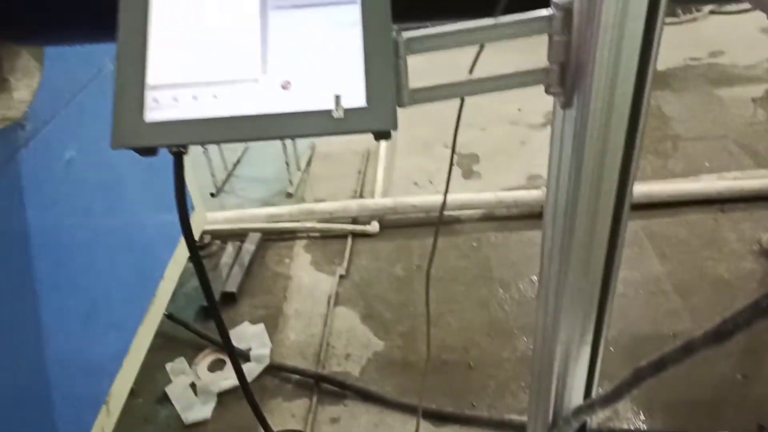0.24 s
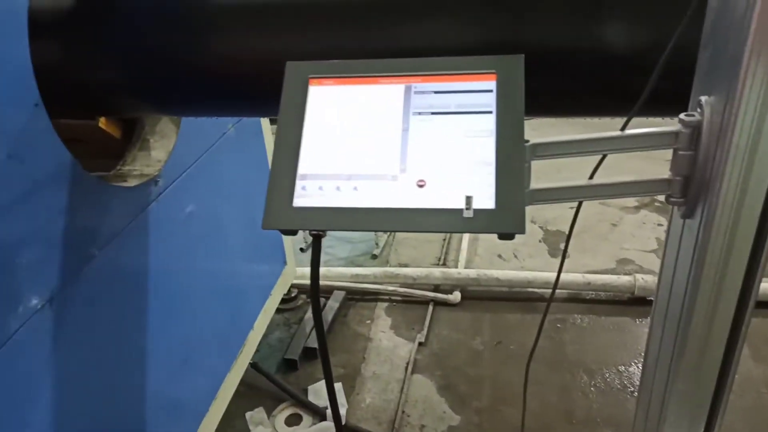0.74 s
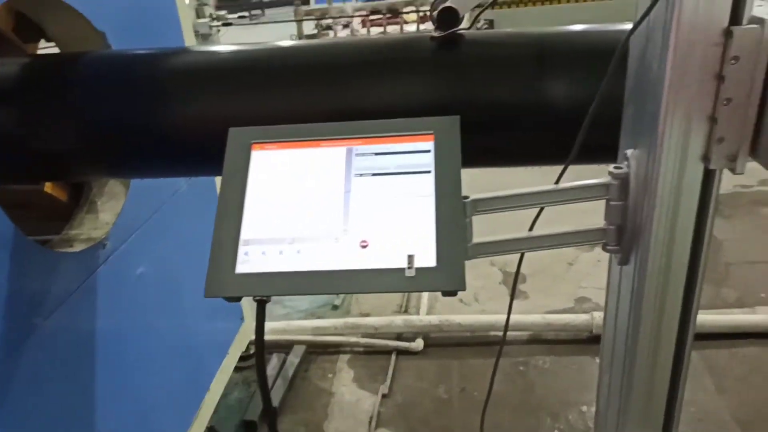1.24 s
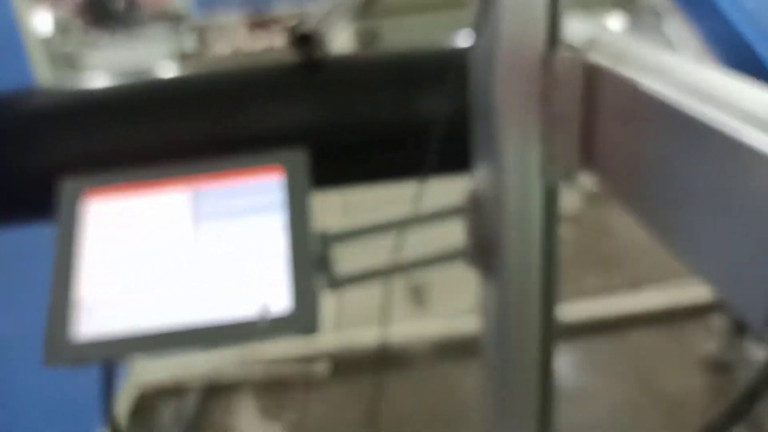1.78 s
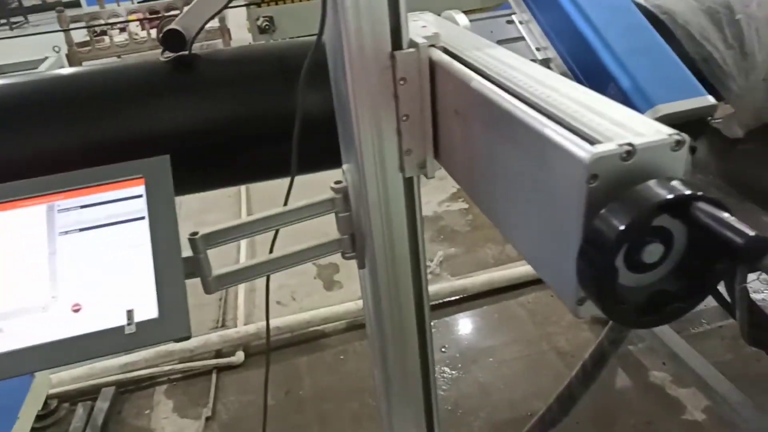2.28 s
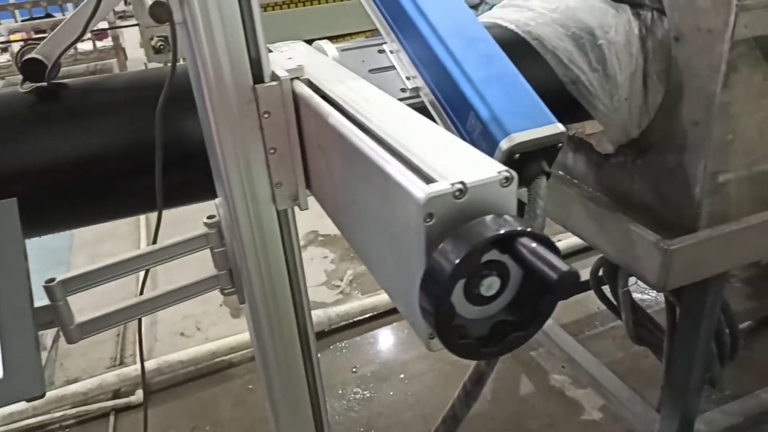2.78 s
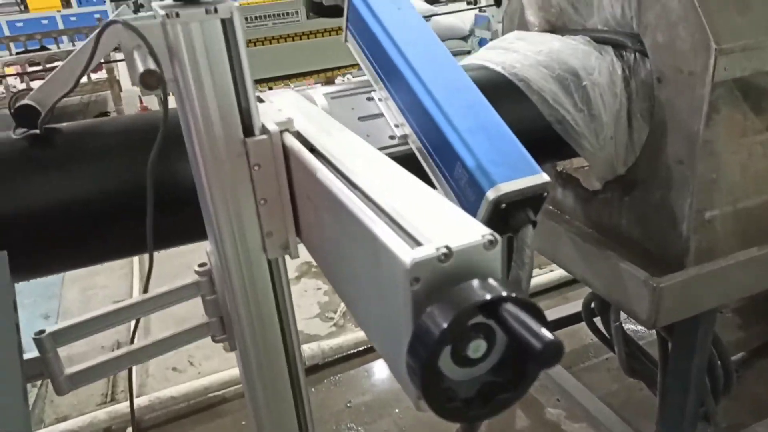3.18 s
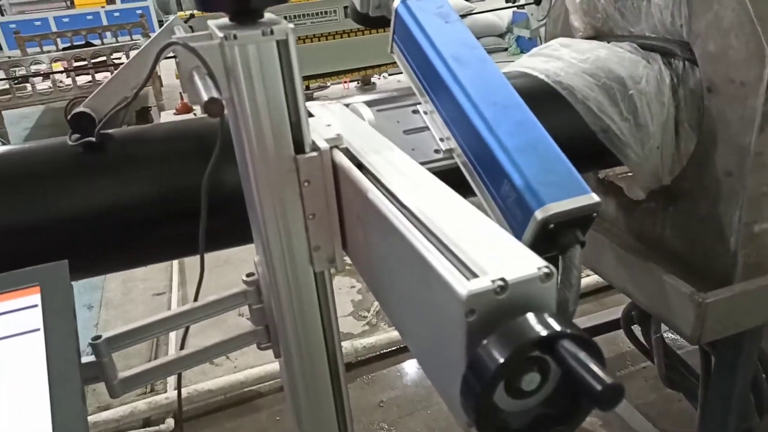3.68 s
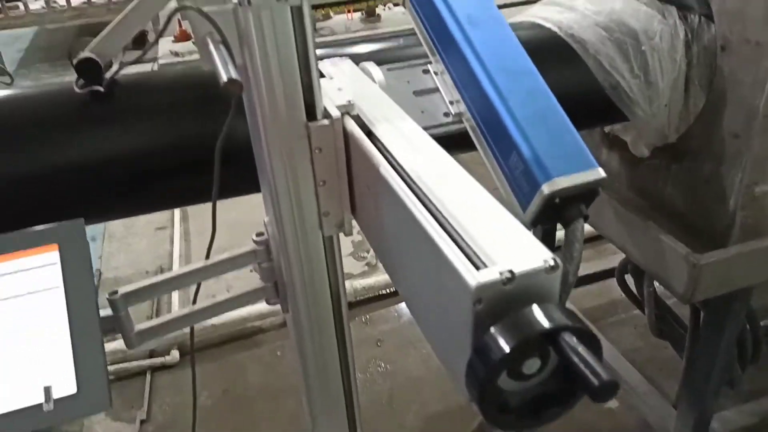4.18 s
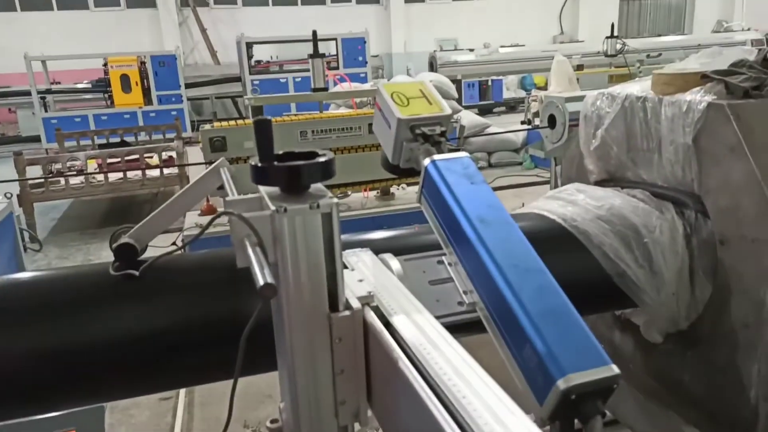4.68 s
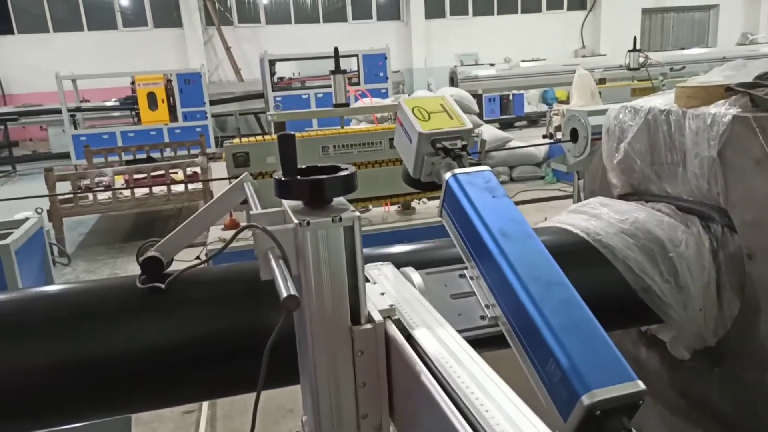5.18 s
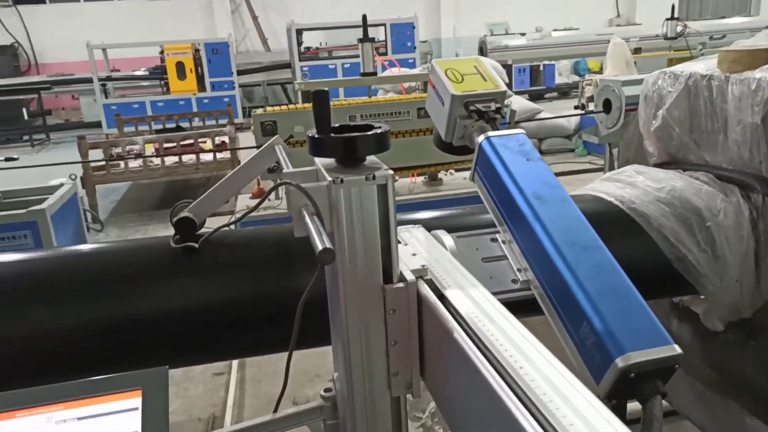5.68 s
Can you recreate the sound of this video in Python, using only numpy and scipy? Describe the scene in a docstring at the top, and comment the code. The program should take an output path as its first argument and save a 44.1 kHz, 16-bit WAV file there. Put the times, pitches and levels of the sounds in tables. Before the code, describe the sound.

Hand-held stereo phone sound close to running pipe-making machinery: a rough, slightly beating motor drone, surging low rumble, gearbox and fan roar spread by the hall, bright whistling air jets and weak whines. It is loud and dense at first, then drops steadily after about three seconds. Several low, dull knocks follow closely near five seconds, leaving a much quieter machine bed at the end.

```python
"""A pump motor drones on four multiples of its shaft rate, beside one strong tone off them, in a plastic pipe
extrusion line with a rumble and a roar. Air and spray hiss in sharp treble bands, and faint whines come and go;
a hand-held phone pans along the line. The drone and whines are wavering sines, and the rumble, roar and hiss
are filtered noise in flickering bands. These steady sources fade in the second half, while a few dull thumps,
short decaying sines, come late on."""
import sys
import numpy as np
from scipy import signal
from scipy.fft import rfft, irfft
from scipy.io import wavfile
from scipy.ndimage import uniform_filter1d

SR = 44100
rng = np.random.default_rng(int(sys.argv[2]) if len(sys.argv) > 2 else 0)


def transcribe(signal):
    """Save signal, clipped to [-1, 1], as a 16-bit WAV file at the path in sys.argv[1]."""
    frames = np.atleast_2d(signal).T
    limited = np.clip(frames, -1, 1)
    pcm = np.round(limited * 32767).astype(np.int16)
    wavfile.write(sys.argv[1], SR, pcm)


N = 261954
T = np.arange(N) / SR
SHAFT_HZ = 24.445  # pump motor; four of the five strong tones sit on multiples of it

# Treble band that stays empty: lower and upper edge [Hz].
EMPTY_BAND_HZ = [8500, 11610]


def undb(db):
    """Decibels to gain."""
    return 10 ** (np.asarray(db) / 20)


def on_log(table, hz):
    """Reads (Hz, value) rows on a log-frequency axis."""
    f, v = np.transpose(table)
    return np.interp(np.log(hz + 1), np.log(f), v)


def over_time(table):
    """Reads (seconds, value) rows as a curve over the whole scene."""
    return np.interp(T, *np.transpose(table))


def shade(table):
    """Colour function from (Hz, dB) rows."""
    return lambda hz: undb(on_log(table, hz))


def walk(rate):
    """Slow random wander of spread 1, with the given number of random knots per second."""
    knots = np.arange(0, N / SR + 1, 1 / rate)
    coarse = np.arange(0, N / SR + .1, .002)
    z = np.interp(coarse, knots, rng.standard_normal(len(knots)))
    z = uniform_filter1d(z, int(250 / rate))  # rounds the corners over half a knot gap
    return np.interp(T, coarse, z / z.std())


def patches(shape, wide, long):
    """Random field over frequency and time, blurred to blobs of the given bins and frames; spread 1."""
    z = rng.standard_normal(shape, np.float32)
    for _ in range(2):
        z = uniform_filter1d(z, max(int(wide), 1), axis=0)
        z = uniform_filter1d(z, max(int(long), 1), axis=1)
    return z / z.std()


def wash(colour, patchy_db, flicker_db, swell_db):
    """Stereo noise whose mono mix has unit RMS; colour(hz) gives the gains; its bands swell and flicker."""
    # How alike left and right are. Each row: frequency in Hz, correlation from -1 to 1.
    likeness = [(25, .72), (60, .96), (200, .96), (400, .82), (540, .48), (800, .25), (950, 0),
                (1150, -.35), (1500, -.27), (1950, 0), (5900, 0), (6400, .09), (7200, .09), (7500, 0),
                (15000, 0)]
    # Noise coming straight from the right. Each row: frequency in Hz, share from 0 to 1.
    from_right = [(1900, 0), (2200, .1), (3200, .12), (3750, .18), (4300, .08), (4800, .1), (5200, .04),
                  (6000, .06), (6300, 0)]
    # Fine flutter in narrow short streaks. Each row: frequency in Hz, spread in dB.
    flutter = [(300, 0), (900, 0.97), (2500, 2), (4000, 0.87), (8400, 1.15), (11600, 1.4)]
    port_lag_s, top_flicker_db = .00042, .7
    size = 1024
    overlap = size * 3 // 4
    hz, _, z = signal.stft(rng.standard_normal((2, N)), SR, nperseg=size, noverlap=overlap)

    right_leads = np.exp(2j * np.pi * hz * port_lag_s)
    like = (on_log(likeness, hz) + on_log(from_right, hz) * right_leads)[:, None]
    left = z[0]
    right = like * left + np.sqrt(1 - np.abs(like) ** 2) * z[1]

    one_row = left[:1].shape  # a single row moves all bins together
    db = patchy_db * patches(left.shape, 12, 30) + flicker_db * patches(left.shape, 25, 5)
    db = db + swell_db * patches(one_row, 1, 7)
    db = db + on_log(flutter, hz)[:, None] * patches(left.shape, 3, 6)
    # the very top also flickers as a whole
    is_top = (hz > EMPTY_BAND_HZ[1])[:, None]
    db = db + top_flicker_db * is_top * patches(one_row, 1, 5)

    moving = np.array([left, right]) * undb(db)
    out = signal.istft(moving, SR, nperseg=size, noverlap=overlap)[1][:, :N]
    out = irfft(rfft(out) * colour(np.fft.rfftfreq(N, 1 / SR)), N)
    return out / np.sqrt(np.mean(out.mean(axis=0) ** 2))


def rumble():
    """Lumpy deep noise of drives and pumps; only its upper part surges."""
    # Spectrum of the deep noise. Each row: frequency in Hz, relative level in dB per Hz.
    spectrum = [(20, -41.5), (40, -35), (58, -31.5), (75, -19), (100, -6), (115, -11), (135, 0.5),
                (170, -3.5), (197, -0.5), (225, -4), (300, -13.5), (400, -41)]
    # Surges of the upper part. Each row: time in seconds, gain in dB.
    surges = [(0, 0), (.4, 1), (.85, 3.5), (1.1, -4), (1.3, 2.5), (1.55, -3), (1.68, 2.5), (1.86, 6),
              (1.93, 0.5), (2.25, -2.5), (2.35, 4), (2.55, 5), (2.72, 2), (2.9, 1), (3.2, -4), (3.65, -3),
              (3.85, -1), (3.97, 3.5), (4.15, 1), (4.37, -8), (4.45, -2), (4.7, 1), (5.0, 5), (5.15, 1),
              (5.94, 2.5)]
    surge_above_hz, sway_db = 100, .3
    even = wash(shade(spectrum), patchy_db=.2, flicker_db=.3, swell_db=.1)
    split = signal.butter(2, surge_above_hz, "highpass", fs=SR, output="sos")
    upper = signal.sosfiltfilt(split, even)
    surge = undb(over_time(surges) + sway_db * walk(5.4))
    return undb(1.5) * (even - upper) + surge * upper


def roar():
    """Middle noise of fans and gearboxes, spread by the hall; it stands out while the thumps sound."""
    # Spectrum of the roar. Each row: frequency in Hz, relative level in dB per Hz.
    spectrum = [(150, -34.5), (230, -5.5), (300, 0), (345, -2), (380, -1.5), (420, -6.5), (520, -8),
                (680, -7.5), (800, -6.5), (870, -8), (930, -10.5), (1000, -12.5), (1400, -11.5),
                (2000, -19.5), (3000, -29.5), (4000, -42)]
    # Swell of the roar. Each row: time in seconds, gain in dB.
    swells = [(0, 0.4), (2.9, 0.5), (3.8, 2.1), (4.6, -0.5), (4.95, 1.5), (5.1, 7.5), (5.4, 3.5),
              (5.65, 1.5), (5.94, 0.5)]
    even = wash(shade(spectrum), patchy_db=0.7, flicker_db=0.86, swell_db=0.07)
    return undb(over_time(swells)) * even


def hiss_colour(hz):
    """Left and right gains: one broad hiss curve up to the sizzle, with steep-sided jet bands added as powers."""
    # Broad hiss of air and spray. Each row: frequency in Hz, relative level in dB per Hz.
    broad = [(1200, -8), (2400, -12), (3200, -9), (3800, -3), (4400, -8.5), (4700, -7), (5000, -12.5),
             (5500, -15.5), (5950, -10), (7000, -9), (8000, -12), (8600, -8)]
    # The curve's thin sizzle at the very top. Each row: frequency in Hz, relative level in dB per Hz.
    sizzle = [(11500, -17.5), (12100, -19), (12700, -21.5), (12950, -26.5), (13050, -19.5), (14300, -21),
              (15500, -24)]
    # Side of the whole curve. Each row: frequency in Hz, left minus right in dB.
    lean = [(2500, 0), (3800, -1.5), (5000, 0), (7600, 0), (8000, -4), (11500, -3), (13200, -4.5)]
    # Whistling air jets. Each row: low edge, top and high edge in Hz, level in dB, left minus right in dB.
    jets = [(6135, 6430, 6940, 1, 0), (7265, 7500, 7860, -2.5, 3), (7800, 8300, 8600, -16, -9.5)]
    side = np.array([[.5], [-.5]])
    power = undb(on_log(broad + sizzle, hz) + side * on_log(lean, hz)) ** 2
    for low_hz, top_hz, high_hz, db, pan_db in jets:
        corners_hz = [low_hz - 90, low_hz, top_hz, high_hz, high_hz + 90]
        shape_db = np.interp(hz, corners_hz, [-31.5, 0.5, 2, -8.5, -40.5])
        power = power + undb(shape_db + db + side * pan_db) ** 2
    return np.sqrt(power)


def air_hiss():
    """Air and spray: noise with whistling jet bands in the treble."""
    return undb(0.3) * wash(hiss_colour, patchy_db=0.14, flicker_db=0.63, swell_db=0.15)


def whines():
    """Faint gear and motor tones that come and go; short waves differ more from port to port."""
    # Pitches of the weak tones. Each entry: frequency in Hz.
    pitches = [342.2, 440, 684.5, 840.3, 1149.2, 1366, 1448, 1772.6, 1829.5, 4428, 4705]
    # Strength once the phone faces the tank. Each entry, one a tone: relative level in dB.
    levels = [-19.5, -23, -26, -19.5, -24.5, -29, -28, -28, -27, -31.5, -33]
    # How much each tone gains by the turn to the tank. Each entry: change in dB.
    gains_at_tank = [4, -2, 0, 0, 3, 0, -2, 2, 3, -4, -5]
    # The phone turns from the control screen to the cooling tank: start and end in seconds.
    turn_s = [1.7, 2.8]
    out = np.zeros((2, N))
    turned = np.interp(T, turn_s, [0, 1])
    for hz, db, tank_db in zip(pitches, levels, gains_at_tank):
        apart = min(hz / 1100, 1)  # how freely the two ports differ
        swell_db, drift = 1.8 * walk(2), .9 * walk(3)
        facing_db = db + tank_db * (turned - 1)
        for c in range(2):
            wander = drift + 1.4 * apart * walk(1.54)
            own_db = 2 * apart * walk(3)
            gain = 2 * undb(facing_db + swell_db + own_db)
            out[c] += gain * np.sin(2 * np.pi * hz * T + wander)
    return out


def thumps():
    """Dull knocks: a soft push, then a short low ring that wavers."""
    # The knocks. Each row: start in seconds, level in dB, pitch in Hz.
    knocks = [(4.87, -25, 204), (4.988, -8.5, 204), (5.095, -10, 211), (5.199, -11, 199), (5.3, -16, 193),
              (5.355, -16, 194), (5.41, -25, 199)]
    push_s, t60_s = 0.014, 0.12
    out, waver = np.zeros(N), .6 * walk(45)
    for s, db, hz in knocks:
        t = np.maximum(T - s, 0)
        push = np.sin(np.pi / 2 * np.minimum(t / push_s, 1)) ** 2
        decay = 1000 ** (-t / t60_s)
        out += undb(db) * push * decay * np.sin(2 * np.pi * hz * t + waver)
    return out


def drone():
    """Strong motor tones; neighbouring shaft multiples beat at the shaft rate."""
    # Pitches of the strong tones, all but the last on shaft multiples. Each entry: frequency in Hz.
    pitches = [15 * SHAFT_HZ, 16 * SHAFT_HZ, 29 * SHAFT_HZ, 30 * SHAFT_HZ, 889.8]
    # The phone moves through each tone's standing waves, one list a tone.
    # Each row: time in seconds, left and right RMS level in dB, left's lead over right in radians.
    at_ports = [
        [(.15, 3, 5, 0), (.5, -1, 3.5, -.1), (1.05, -2.5, 2.5, -.1), (1.4, 1.5, 3.5, -.1), (2.2, 3.5, 4.5, -.1),
         (2.55, 2.5, 0, -.1), (3.4, 3.5, 4, -.2), (3.75, 5, 5.5, -.1), (4.3, -1, -3, -.2), (5.25, 2.5, 0, 0),
         (5.6, 2.5, 1, -.2)],
        [(.2, 1, 1.5, -0.46), (.45, -5, -5, -0.35), (.75, -6, -1, -.3), (1.05, -12, -5, -.5),
         (1.65, -9, -3, -0.25), (2.1, -5, -3.5, -0.34), (2.45, -4, -1, -0.39), (3.1, -3.5, -4.5, -0.39),
         (3.75, -1, -1.5, -0.33), (4.2, -6.5, -3.5, -.1), (4.65, -2.5, 2.5, -.1), (5.25, -2, -7, .2),
         (5.6, -14, -3, 0)],
        [(.15, -8, -27, -4.5), (.45, -6, -11, -0.5), (1.1, -11, -17, 0.7), (1.65, -9, -28, -2.2),
         (2.0, -13, -23, -5), (2.9, -19, -23, 3), (3.7, -20, -15, -0.5), (4.65, -29, -14, -3),
         (5.6, -22, -17, 4)],
        [(.15, -2, -19, -2), (.45, -14, -9, 0.3), (1.05, -7, -8, 2), (1.35, -11, -10, 1), (1.65, -9, -1.5, 2.0),
         (2.0, -8, -4, 1.6), (2.25, -10, -6, 1), (2.6, -7.5, 2.5, 1), (3.05, -10, -0.5, 1), (3.2, -9.5, -3, 0),
         (3.75, -6, 2, 0.7), (4.05, -7, 0, 0.6), (4.35, -9, -6, 1.5), (4.95, -11, -3, 1.5),
         (5.25, -19, -7, 0.5), (5.6, -11, -5, 4.5)],
        [(.15, -15, -7, -2.5), (.55, -15, -6, -0.5), (.8, -16, -5.5, -1.8), (1.05, -22, -7, -2.5),
         (1.55, -11, -7.5, -1), (1.7, -15, -7.5, 2), (2.0, -9.5, -10.5, 0.6), (2.55, -9.5, -15, 1.4),
         (3.0, -7, -25, 1.5), (3.45, -10, -25, 3), (3.9, -7, -23, 4), (4.5, -6.5, -15, 3), (5.6, -8.5, -21, 4)],
    ]
    # Small hand movements shift each tone, at each port on its own. Each entry: spread in dB.
    sways = [0.45, 0.84, 1.3, 1, 1.7]
    # Roughness of each tone from uneven load. Each entry: spread in dB.
    wavers = [.5, 1.6, 1, .8, 2]
    out = 0
    for hz, rows, sway_db, waver_db in zip(pitches, at_ports, sways, wavers):
        s, *cols = np.transpose(rows)
        left_db, right_db, lead = (np.interp(T, s, c) for c in cols)
        phase = 2 * np.pi * hz * T + 2 * np.pi * rng.random()
        # uneven load roughens both phase and level
        phase = phase + .15 * walk(3) + .08 * waver_db * walk(14)
        rough_db = waver_db * walk(16)
        ports_db = np.array([db + sway_db * walk(6) for db in (left_db, right_db)])
        gain = np.sqrt(2) * undb(ports_db + rough_db)
        out = out + gain * np.sin(phase + np.array([lead, -lead]) / 2)
    return out


def scene():
    """All steady sources share one fade; the thumps come on top."""
    # Level of the steady sources, fading in the second half. Each row: time in seconds, gain in dB.
    fade = [(0.0, -22.5), (.95, -21.5), (1.12, -20), (1.3, -21.5), (1.9, -22.5), (2.2, -22), (2.7, -22.5),
            (3.35, -23.5), (3.55, -25.3), (4.0, -27), (4.5, -28), (4.97, -32), (5.03, -36.5), (5.3, -36.5),
            (5.5, -36), (5.62, -37.5), (5.94, -40.5)]
    steady = rumble() + roar() + air_hiss() + whines() + drone()
    return undb(over_time(fade)) * steady + thumps()


def record(dry):
    """The phone thins the deep bass and rounds the peaks; a treble band stays empty, and the top is cut."""
    low_cut_hz, top_hz = 73, 15500
    bass = signal.butter(2, low_cut_hz, "highpass", fs=SR, output="sos")
    gap = signal.ellip(12, .3, 90, EMPTY_BAND_HZ, "bandstop", fs=SR, output="sos")
    top = signal.ellip(16, .3, 90, top_hz, fs=SR, output="sos")
    thinned = signal.sosfilt(bass, dry)
    rounded = np.tanh(0.95 * thinned) / 0.9
    return signal.sosfilt(top, signal.sosfilt(gap, rounded))


dry = scene()
out = record(dry)
transcribe(out)
```